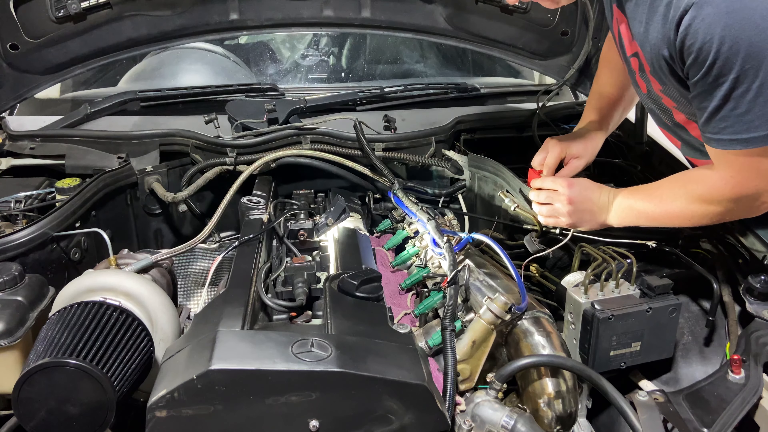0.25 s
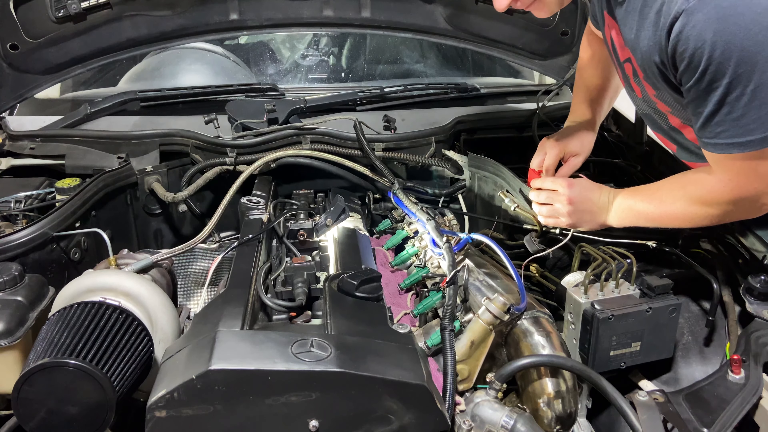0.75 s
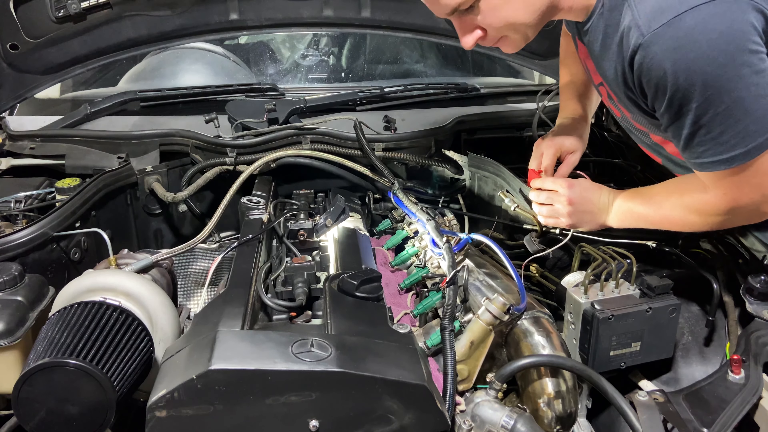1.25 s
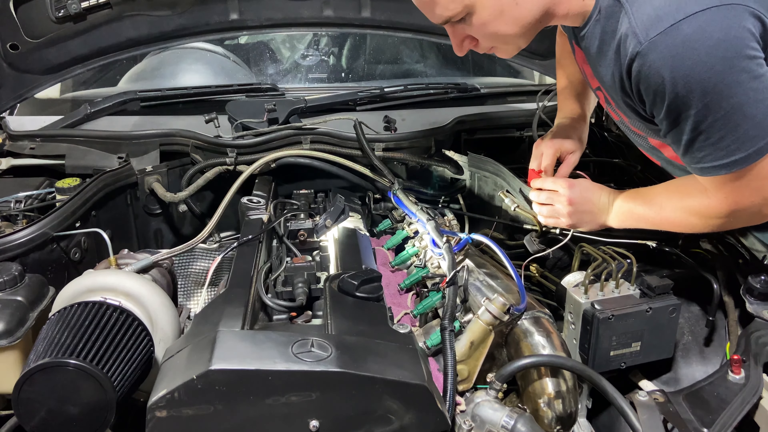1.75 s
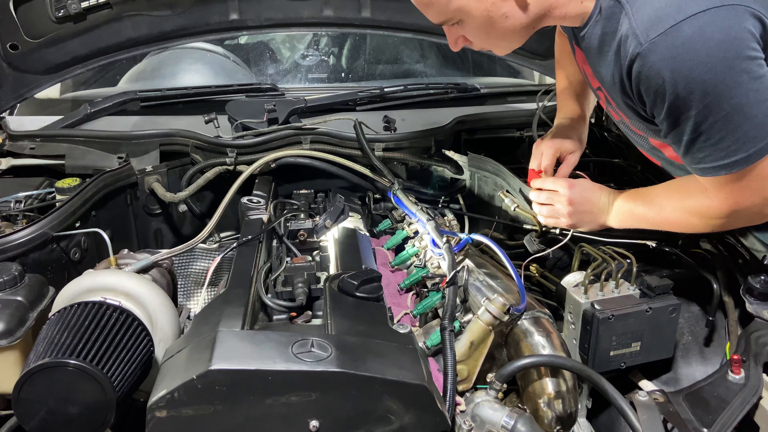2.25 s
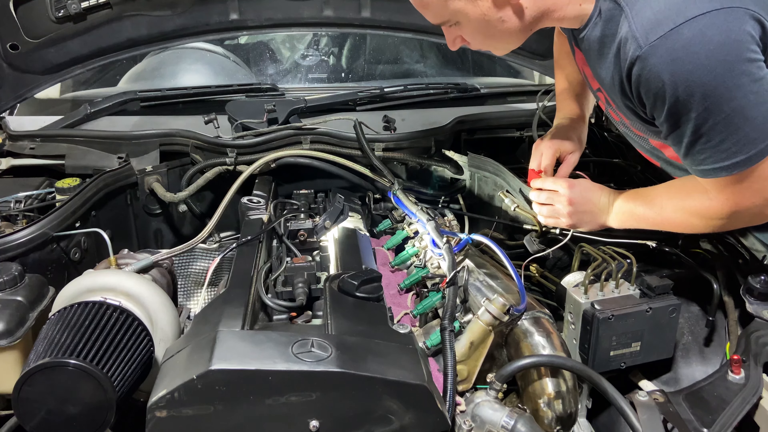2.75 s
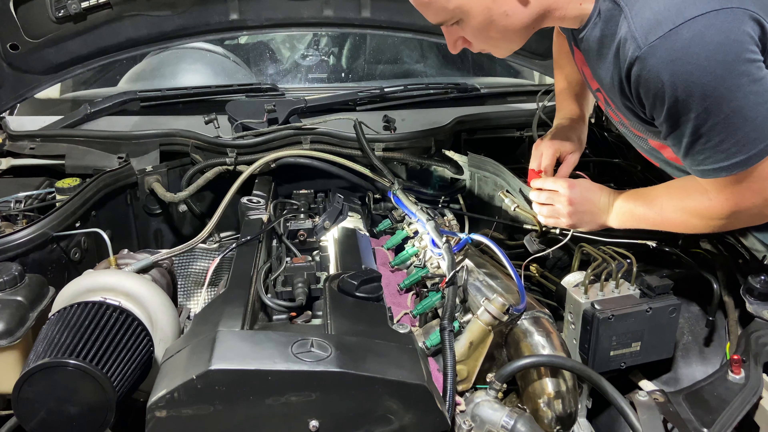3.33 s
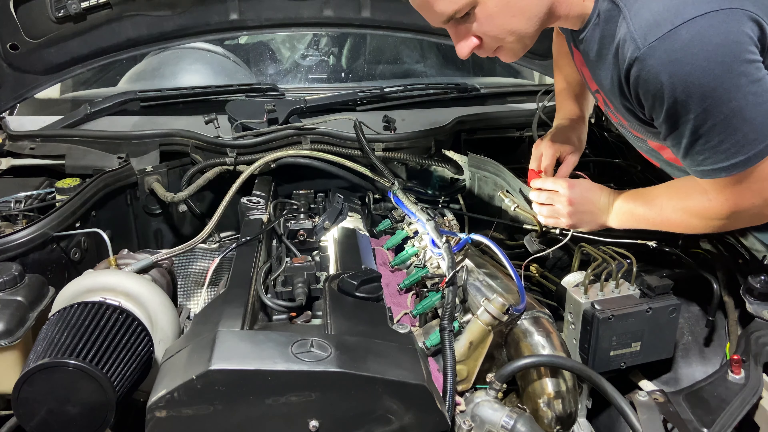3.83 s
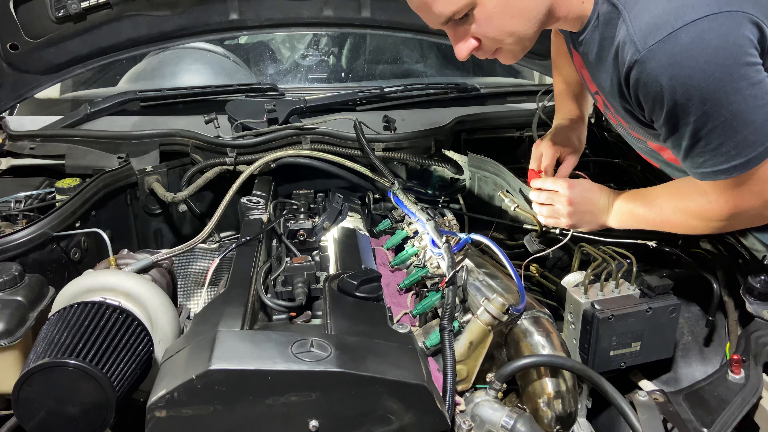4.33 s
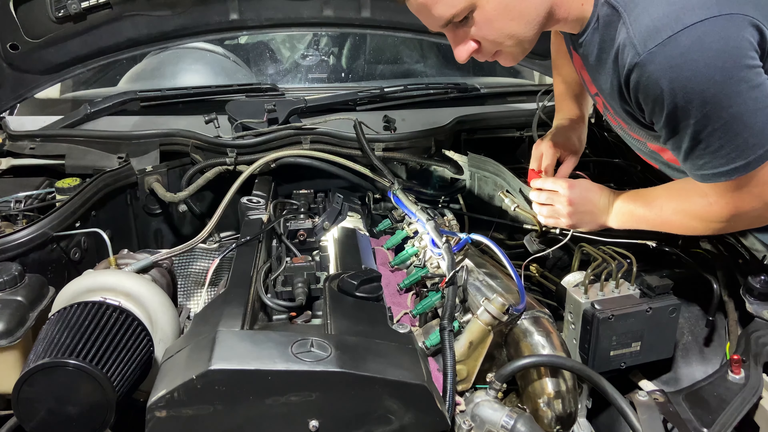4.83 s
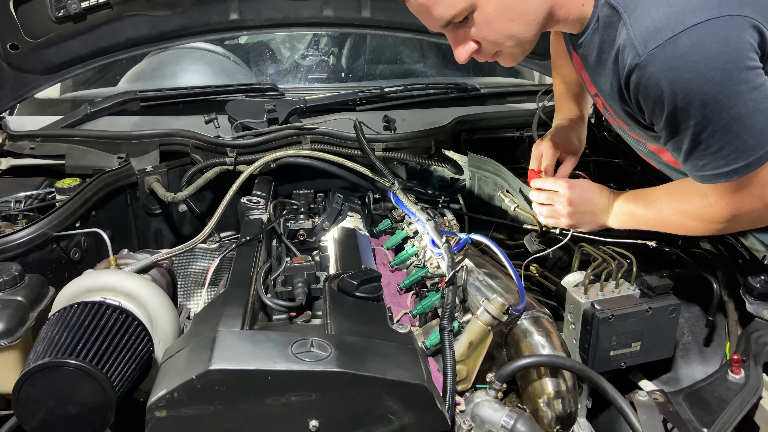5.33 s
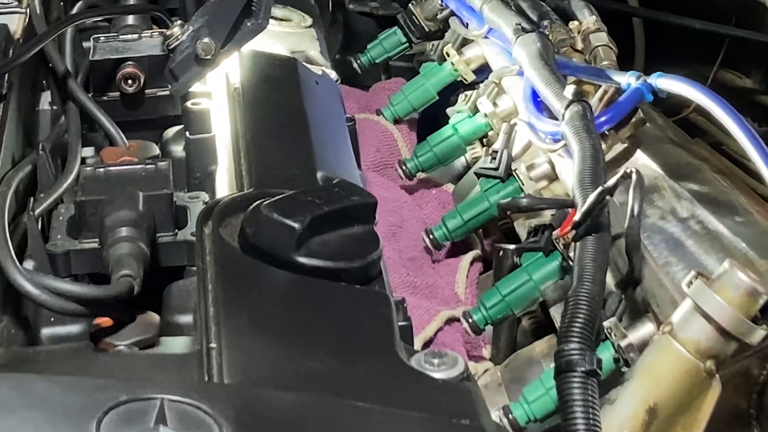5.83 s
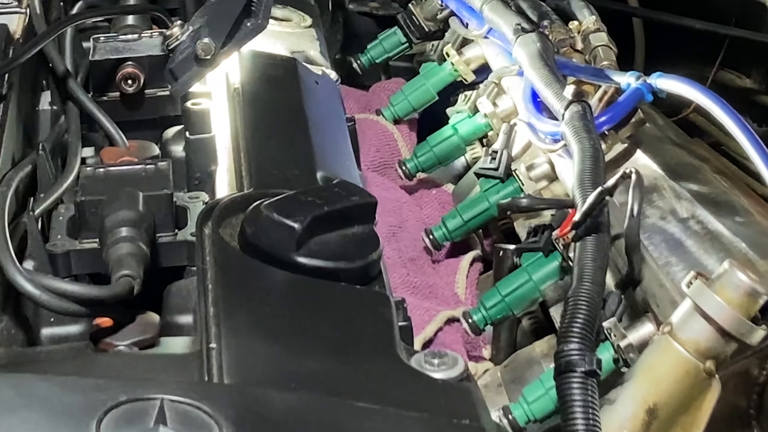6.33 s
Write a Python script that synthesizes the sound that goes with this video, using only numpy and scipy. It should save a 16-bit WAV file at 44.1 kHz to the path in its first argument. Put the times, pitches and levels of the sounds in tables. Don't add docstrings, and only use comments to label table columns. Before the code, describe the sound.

In a garage, close above an open engine bay, a solenoid cracks and thuds, and a starter motor whirrs up with a short rough moan and squeal. The engine then cranks continuously, about ten chuffing compression pulses a second, each with a hollow low boom, a nasal ring and a light metallic rattle. A wavering low drone lies beneath. It never fires and is still cranking at the end.

```python
import sys
import numpy as np
from scipy import signal
from scipy.fft import rfft, irfft
from scipy.io import wavfile
from scipy.ndimage import uniform_filter1d

SR = 44100
rng = np.random.default_rng(int(sys.argv[2]) if len(sys.argv) > 2 else 0)


def gain_from_decibels(decibels):
    exponent = np.asarray(decibels, float) / 20
    return 10 ** exponent


def to_wav(s):
    ch = np.atleast_2d(s).T
    pcm = np.round(np.clip(ch, -1, 1) * 32767)
    wavfile.write(sys.argv[1], SR, pcm.astype(np.int16))


N = 291060
T = np.arange(N) / SR
HZ = np.maximum(np.fft.rfftfreq(N, 1 / SR), 1)


def along(table):
    hz, value = np.transpose(table)
    return np.interp(np.log(HZ), np.log(hz), value)


def modes(table):
    return sum(gain_from_decibels(2 * db) / (1 + (2 * (HZ - hz) / width) ** 2) ** 2 for hz, width, db in table)


def slope(table):
    first_hz, first_db = table[0]
    return gain_from_decibels(2 * along([(first_hz / 2, first_db - 40)] + list(table)))


def walk(rate_hz):
    held = int(SR / rate_hz)
    steps = np.repeat(rng.standard_normal(N // held + 1), held)
    return 1.237 * uniform_filter1d(uniform_filter1d(steps, held), held)[:N]


# freq_hz, likeness (0-1)
LIKENESS = [(50, .8), (100, .85), (170, .95), (300, .82), (600, .68), (1000, .5), (1500, .48), (2500, .4),
            (4500, .5), (5700, .25), (6500, .8), (7200, .91), (8300, 1), (20000, 1)]
# freq_hz, level_db
LEAN = [(49, -6), (80, -1), (150, 2), (300, 2), (600, 1.2), (1300, 2), (2400, 3), (4400, 3.8), (5800, 2.5),
        (8000, 0)]
# freq_hz, lead_rad
SKEW = [(100, 0.39), (300, -0.87), (520, 0.34), (900, 1.12), (1290, 1.62), (2000, 1.24), (2700, -0.15),
        (4500, 0.33), (5500, -1.45), (6600, -0.17)]
TREBLE_LAG_SAMPLES, SPLIT_HZ = 10.6, 7070


def noise(power, grit_db=0.):
    direct, diffuse = rfft(rng.standard_normal((2, N)) * gain_from_decibels(grit_db * walk(900)))
    like = along(LIKENESS)
    lag = 2 * np.pi * np.maximum(HZ - SPLIT_HZ, 0) * TREBLE_LAG_SAMPLES / SR
    left = direct * np.exp(1j * (along(SKEW) - lag))
    right = like * direct + np.sqrt(np.maximum(1 - like ** 2, 0)) * diffuse
    lean = gain_from_decibels(along(LEAN) / 2)
    x = irfft(np.sqrt(power) * np.array([left * lean, right / lean]), N)
    return x / np.sqrt(np.mean(x ** 2))


def gated(x, times, dbs, wait, rise, hold, t60):
    out, t = np.zeros_like(x), np.arange(SR // 6) / SR
    for s, db, fall in zip(times, dbs, np.broadcast_to(t60, len(times))):
        shape = np.clip(t / rise, 0, 1) * gain_from_decibels(-60 * np.maximum(t - rise - hold, 0) / fall)
        i = min(int((s + wait) * SR), N - 2)
        burst = x[:, i:i + len(t)] * shape[:N - i]
        energy = np.sum(burst.mean(axis=0) ** 2) / np.sum(shape[:N - i] ** 2)
        out[:, i:i + len(t)] += gain_from_decibels(db) * burst / np.sqrt(energy + 0.036)
    return out


def ring(times, dbs, tones, rise, t60):
    out, t = np.zeros(N + SR), np.arange(SR // 5) / SR
    for s, db, tone, fall in zip(times, dbs, tones, t60):
        push = np.sin(np.pi / 2 * np.clip(t / rise, 0, 1)) ** 2
        shape = push * gain_from_decibels(-60 * np.maximum(t - rise, 0) / fall)
        wave = sum(gain_from_decibels(g) * np.cos(2 * np.pi * hz * (t - rise)) for hz, g in tone)
        i = int(s * SR)
        out[i:i + len(t)] += gain_from_decibels(db) * shape * wave
    return np.array([out[8:N + 8], out[:N] * gain_from_decibels(-1.5)])


# start_s, strokes_done
CRANK = [(.333, 0), (.441, 1), (.564, 2), (.675, 3), (.782, 4), (1.298, 9), (2.426, 20), (3.341, 29),
         (4.254, 38), (5.255, 48), (6.544, 61)]
CYLINDER_LATE_S = [.0015, 0, -.0005, -.0005, .0005, -.0015]
# boom_db, mesh_db
CYLINDERS = [(-33, -28.5), (-29, -29), (-30.5, -30.3), (-32.5, -30), (-31.5, -30), (-30.5, -29.5)]
# boom_db, mesh_db, puff_db, gear_db
SCATTER_DB = [1.2, 1., 1.1, .6]
# start_s, boom_change_db, mesh_change_db, puff_change_db
ODD = [(.333, -19, -23, -5.5), (.441, -4, -2, -1), (.564, 0, -2, 2.5), (.675, 2, 5.5, 4),
       (.782, 1.5, -5, -0.5), (1.298, -2, 3.5, -1.5), (1.401, 1, -5, 1.5), (1.502, -0.5, -5.5, -0.5),
       (2.221, 0, -4.5, -0.5), (2.833, 0, 0, 0), (3.341, 1.5, 2, 1), (3.543, 3.5, 1, 0),
       (3.641, 2.5, -6, 1), (3.745, 1, 0, -0.5), (4.152, 1.5, -1.5, 2.5), (4.551, 2, -7, -0.5),
       (4.656, -5, -5, 0.5), (4.754, -2, -5, 0.5), (5.055, 0, 2, 0), (5.255, -14, -7.5, 1.5),
       (5.852, -1, 3.5, -0.5), (5.948, -0.5, -3, -1.5), (6.544, 1, -4, -1.5)]
PUFF_DB, PUFF_FADE_DB_PER_S = -29, -0.1339
GEAR_DB, GEAR_GROW_DB_PER_S = -35, 0.21


def stroke_table():
    at, done = np.transpose(CRANK)
    k = np.arange(int(done[-1]) + 1)
    s = np.interp(k, done, at) + np.resize(CYLINDER_LATE_S, len(k))
    change = SCATTER_DB * rng.standard_normal((len(k), 4))
    for when, *db in ODD:
        change[np.argmin(abs(s - when)), :len(db)] = db
    boom_db, mesh_db = np.array(CYLINDERS)[k % len(CYLINDERS)].T
    puff_db = PUFF_DB + PUFF_FADE_DB_PER_S * s
    gear_db = GEAR_DB + GEAR_GROW_DB_PER_S * s
    return (s, *(np.array([boom_db, mesh_db, puff_db, gear_db]) + change.T))


def strokes(s, boom_db, mesh_db, puff_db, gear_db):
    gas = manifold(s, boom_db) + gear_mesh(s, mesh_db) + puffs(s, puff_db) + jets(s, gear_db)
    return gas + ring_gear(s, gear_db) + block_knock(s, puff_db)


# freq_hz, level_db
BOOM = [(168, 2), (190, -1)]
BOOM_T60 = [0.19, 0.28, 0.36]


def manifold(s, boom_db):
    hz, db = np.transpose(BOOM)
    detune = 1 + .006 * rng.standard_normal((len(s), 2))
    tones = [np.transpose([hz * d, db]) for d in detune]
    return ring(s + 0.00087, boom_db + 2.0, tones, 0.0221, np.resize(BOOM_T60, len(s)))


# freq_hz, width_hz, level_db
MESH = [(531.4, 18.7, 1), (556, 82, -8)]
# start_s, pitch_share
MESH_PITCH = [(0, 0.95), (2.5, 0.92), (4.5, 0.98), (6.6, 0.98)]


def gear_mesh(s, mesh_db):
    place = np.cumsum(np.interp(T, *np.transpose(MESH_PITCH)))
    note = np.array([np.interp(place, np.arange(N), side) for side in noise(modes(MESH))])
    return gated(note, s, mesh_db + 2.0, 0.00043, 0.012, 0.022, 0.17)


# freq_hz, level_db (per Hz)
PUFF = [(250, -10.5), (400, -1), (700, -1.5), (900, -9.5), (1300, 4), (1800, -6), (2600, -6.5), (4000, -24),
        (6000, -24)]
# freq_hz, width_hz, level_db
PUFF_MODES = [(418, 18, 5), (932, 58, 17), (981, 40, 16), (1079, 37, 15), (1260, 10.4, 9),
              (1457, 8.3, 10.5), (1562, 7, 14), (1711, 29, 8)]


def puffs(s, puff_db):
    breath = noise(slope(PUFF) * (1 + modes(PUFF_MODES)), grit_db=0.5)
    return gated(breath, s, puff_db + 3.0, -0.00066, 0.0036, 0.02, 0.32)


# freq_hz, width_hz, level_db
GEAR = [(3470, 19, 2), (3570, 30, -2), (3760, 25, 1), (4000, 66, -11), (4070, 31, 0), (3806, 550, -8),
        (5100, 48, -3), (5270, 46, -6), (5540, 18, -3)]


def ring_gear(s, gear_db):
    return gated(noise(modes(GEAR), grit_db=-1.0), s, gear_db + .5, 0, 0.0084, 0.018, 0.42)


# freq_hz, level_db (per Hz)
JET = [(4500, -2.5), (6000, -4.5), (8000, -6.5), (11000, -9.5), (15000, -11), (16500, -22)]


def jets(s, gear_db):
    return gated(noise(slope(JET), grit_db=1.5), s, gear_db - 1, -0.004, 0.00073, .003, 0.089)


# freq_hz, level_db
KNOCK = [(82, -1.5), (110, -0.5)]
# freq_hz, width_hz, level_db
SUMP = [(284, 22, 7.5), (350, 89, -4.5)]


def block_knock(s, puff_db):
    blows = np.r_[s - .014, s + .017]
    knock_db = -39.5 + 1.5 * rng.standard_normal(len(blows))
    knock = ring(blows, knock_db, [KNOCK] * len(blows), 0.0152, np.full(len(blows), .08))
    return knock + gated(noise(modes(SUMP)), s, puff_db - 9, 0.0037, 0.013, 0.0025, 0.19)


# start_s, whirr_db, drone_hz, drone_db
STARTER = [(0.0, -32, 55.8, -52), (0.05, -21, 55.8, -60), (0.09, -28, 55.1, -40), (0.24, -28.5, 54, -57),
           (0.33, -29.5, 49, -37), (0.75, -27.5, 48.1, -48), (1.27, -29, 48, -41), (2.3, -28.5, 47.3, -42),
           (2.52, -28.5, 49.3, -43), (3.55, -28.5, 48.3, -42), (5.0, -29.5, 49.3, -38.5),
           (5.16, -29, 50.7, -38), (6.6, -29, 50, -41)]
# freq_hz, level_db (per Hz)
WHIRR = [(30, -12), (60, -4.5), (178, -5.5), (326, -13), (509, -1), (645, -7.5), (955, -4), (1940, -9.5),
         (3100, -10), (5000, -14), (7200, -17), (9000, -19.5), (12000, -26), (15800, -36)]
# freq_hz, width_hz, level_db
WHIRR_MODES = [(78, 12, -7), (108, 8, -6), (187, 34, 8.5), (287, 9.6, 9.5), (530, 27, -14), (750, 80, -1.5),
               (967, 71, -26), (5200, 1240, 3.5), (6990, 100, 7)]
# centre_s, change_db, half_length_s
LULLS = [
    (.75, 8, .04),
    (.8, -18, .03),
    (1.66, -6, .08),
    (1.764, 7, .05),
    (1.83, -7, .04),
    (2.4, -7, .05),
    (3.03, 4, .08),
    (3.639, -18, 0.056),
    (4.068, 8, 0.088),
]


def starter(onsets):
    s, whirr_db, drone_hz, drone_db = np.transpose(STARTER)
    on = np.clip((T - .035) / 0.04, 0, 1) ** 2
    sag_db = -2.5 * (np.interp(T, onsets[2:], np.arange(len(onsets) - 2), left=.5) % 1)
    whirr = noise(slope(WHIRR) * (1 + modes(WHIRR_MODES)), grit_db=0.2)
    whirr *= gain_from_decibels(sag_db + np.interp(T, s, whirr_db) + 4.0 + 0.68 * walk(14))
    pitch_hz = np.interp(T, s, drone_hz) * (1 + 0.02 * walk(8))
    lead_rad = np.array([[.45], [0]])
    drone = np.sin(2 * np.pi * np.cumsum(pitch_hz) / SR + lead_rad)
    lull_db = sum(db * np.maximum(1 - abs(T - at) / half, 0) for at, db, half in LULLS)
    flutter_db = 1.2 * walk(12)
    side_db = np.array([[-3.], [2.6]])
    drone *= gain_from_decibels(np.interp(T, s, drone_db) + 5.0 + flutter_db + lull_db + side_db)
    return on * (whirr + drone)


# start_s, moan_hz, moan_db, squeal_hz, squeal_db
BITE = [
    (0.11, 1003, -37, 1950, -47),
    (.21, 1040, -32, 2300, -38.5),
    (.275, 1020, -38, 2650, -47),
    (0.315, 1040, -32, 3050, -37),
    (0.35, 975, -28, 2800, -34),
    (0.41, 930, -39, 2480, -44),
    (.475, 1020, -30.5, 3050, -35),
    (0.54, 980, -42, 2950, -43),
    (.72, 980, -66, 3400, -45),
]
# freq_hz, width_hz, level_db
GRIND = [(542, 91, -0.5), (1340, 600, -2), (1670, 180, -11), (5080, 250, -7)]


def bite():
    s, *columns = np.transpose(BITE)
    grind_db = np.interp(T, s, columns[1], left=-99, right=-99) + 4.5
    out = noise(modes(GRIND), grit_db=1.0) * gain_from_decibels(grind_db)
    for hz, db in zip(columns[::2], columns[1::2]):
        tone_db = np.interp(T, s, db, left=-99, right=-99) + 6.5
        for strand in ([1, 0.15], [0.45, 0.99]):
            waver = 1 + .008 * walk(40) + .032 * walk(300)
            tone = np.sin(2 * np.pi * np.cumsum(np.interp(T, s, hz) * waver) / SR)
            out += np.array(strand)[:, None] * tone * gain_from_decibels(tone_db + 2.8 * walk(110))
    return out


# start_s, crack_db, thud_hz, thud_db, t60_s
CLUNK = [
    (0.039, -35.5, 300, -56, 0.53),
    (.049, -48, 535, -35, 0.58),
    (0.053, -16.5, 396, -52, 0.11),
    (0.074, -23, 250, -35, 0.097),
    (.086, -44, 170.5, -23, 0.33),
    (0.299, -33, 108, -32.5, 0.24),
    (0.309, -41, 350, -35.5, 0.27),
]
# freq_hz, level_db (per Hz)
CRACK = [(300, -5), (550, -3.5), (1300, 0), (2100, -3.5), (3100, -3), (4000, -13), (7000, -11.5),
         (12000, -20), (16500, -24)]


def solenoid():
    s, crack_db, thud_hz, thud_db, t60 = np.transpose(CLUNK)
    crack = gated(noise(slope(CRACK), grit_db=0), s, crack_db, -0.0019, 0.0026, 0.0038, t60)
    return crack + ring(s - .005, thud_db + 7.5, [[(hz, 0)] for hz in thud_hz], 0.00745, t60)


def mount():
    hum_hz, hum_db, start_s = 109, -44.5, .3
    hum = np.sin(2 * np.pi * np.cumsum(hum_hz * (1 + .008 * walk(6))) / SR)
    return np.clip((T - start_s) / 0.058, 0, 1) * hum * gain_from_decibels(hum_db + 2.0 * walk(5))


# freq_hz, level_db (per Hz)
ROOM = [(18, -31), (30, 8), (424, 0.5), (816, -16), (2040, -12), (6150, -18), (8870, -11), (15800, -15)]
ROOM_DB = -41


def garage_air():
    return gain_from_decibels(ROOM_DB) * noise(slope(ROOM))


def scene():
    table = stroke_table()
    onsets = table[0]
    return strokes(*table) + starter(onsets) + bite() + solenoid() + mount() + garage_air()


def low_pass(x):
    return signal.sosfilt(signal.butter(12, 17020, fs=SR, output="sos"), x)


def record(dry):
    top = signal.ellip(12, .3, 90, 15740, fs=SR, output="sos")
    mix = signal.sosfilt(top, dry)
    return low_pass(mix)


dry = scene()
out = record(dry)
to_wav(out)
```